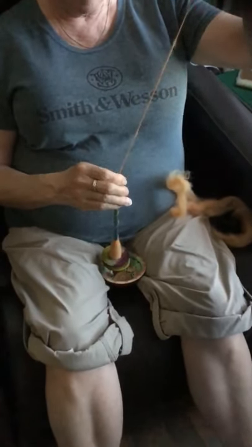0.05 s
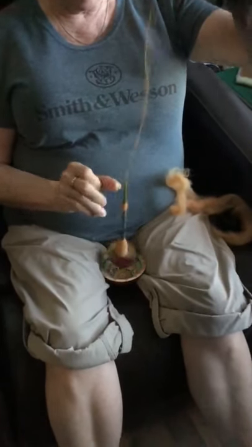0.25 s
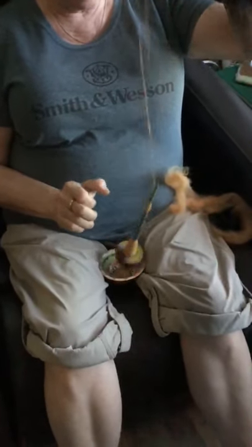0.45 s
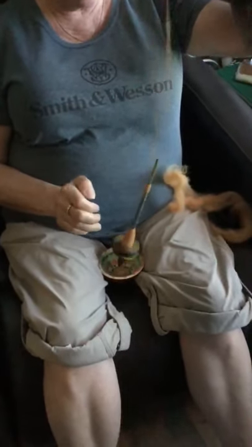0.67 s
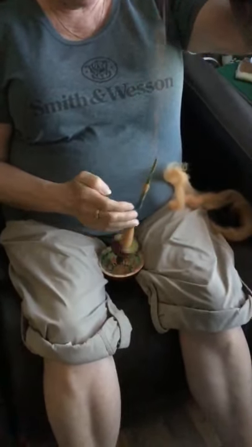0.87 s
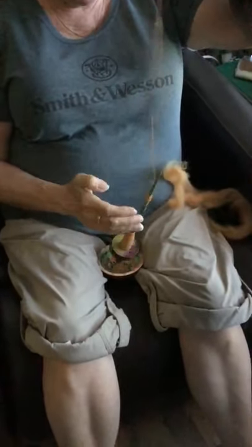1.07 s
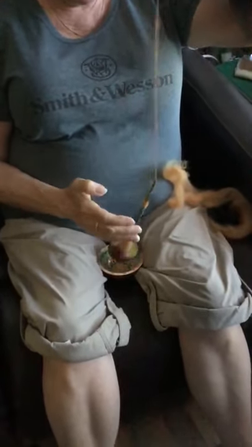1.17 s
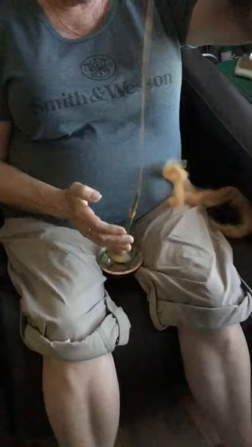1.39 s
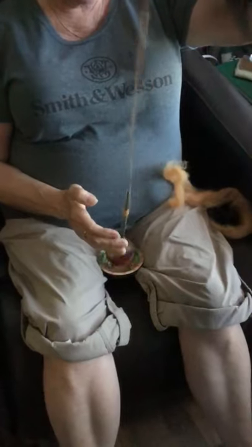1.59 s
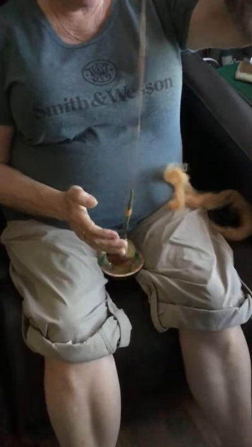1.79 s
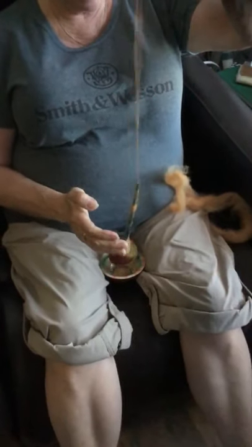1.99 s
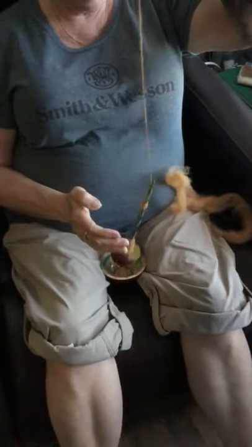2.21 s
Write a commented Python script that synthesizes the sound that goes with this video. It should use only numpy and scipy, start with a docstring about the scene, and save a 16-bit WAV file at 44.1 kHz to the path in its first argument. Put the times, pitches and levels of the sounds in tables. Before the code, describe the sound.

A spindle spins in a small glazed dish, its tip scraping roughly with quick rattling clicks and tiny squeaks. The scrape breaks into ever weaker scuffs, heard close by in a quiet room with a low hum.

```python
"""In a quiet room with a low hum, a spindle is flicked into a spin in a small dish.
Stick-slip friction drives the dish's modes as the tip scrapes round the bowl; the tip also judders,
rattles against the glaze and chirps when it locks on to a mode. As the spindle settles, the scrape
breaks up into soft, ever weaker scuffs. A faint low tone swells at the very end."""
import sys
import numpy as np
from scipy import signal
from scipy.fft import rfft, irfft, next_fast_len
from scipy.io import wavfile
from scipy.ndimage import uniform_filter1d, map_coordinates

SR = 44100
rng = np.random.default_rng(int(sys.argv[2]) if len(sys.argv) > 2 else 0)


def unload_wav(signal):
    """Save mono or channel-first audio to the path in sys.argv[1] as 16-bit WAV at rate SR, clipped to [-1, 1]."""
    wavfile.write(
        sys.argv[1],
        SR,
        np.round(np.clip(np.atleast_2d(signal).T, -1, 1) * 32767).astype(np.int16),
    )


N = 99225

# spectrum of the room's air, a murmur under faint hiss: f/Hz, level/dB
AIR_SPECTRUM = [(15, -72), (25, -37), (49, -10.5), (69, -4.5), (93, -7), (129, -3.5), (164, -8.5),
                (297, -6.5), (421, -16), (1080, -18.5), (1850, -24), (4750, -26), (11000, -35.5),
                (14000, -42), (15500, -56)]
# envelope of the low tone: t/s, level/dB
DRONE_ENVELOPE = [(0, -78), (2.15, -80.5), (2.2, -63), (2.25, -63.5)]
# modes of the dish: f/Hz, T60/s, level/dB
DISH_MODES = [(618.5, 0.026, -8.5), (728, 0.033, -8), (803.4, 0.077, -6.5), (926, 0.039, -11),
              (1081, 0.037, -2.5), (1203, 0.046, -2), (1317, 0.058, -3.5), (1428, 0.032, -5.5),
              (1580, 0.022, -6), (1706, 0.058, -7), (1790, 0.021, -7), (2426, 0.0084, -8), (3298, .015, -4),
              (3670, 0.0082, -9), (3922, 0.024, -10.5), (5550, 0.0074, -7), (6550, 0.0092, -9),
              (7330, 0.011, -16), (8220, 0.017, -12.5), (10270, 0.0026, -24.5), (12040, 0.011, -32)]
# friction force of the scrape: t/s, level/dB
SCRAPE_FORCE = [(.19, -90), (.23, -58.5), (.256, -49), (.308, -42), (.328, -42.5), (.38, -47), (.408, -51),
                (.43, -46.5), (.467, -49.5), (.52, -45), (.56, -52), (.585, -43.5), (.70, -48), (.764, -48),
                (.795, -49), (.81, -46.5), (.875, -44), (.94, -50.5), (.99, -55), (1.03, -50), (1.11, -49),
                (1.16, -54), (1.205, -54.5), (1.226, -64), (1.30, -59), (1.35, -67), (1.42, -71),
                (1.52, -73), (1.65, -86)]
# spells of even slipping: t/s, duration/s, slip rate/Hz, level/dB
JUDDER_EVENTS = [(0.209, 0.063, 335, -51), (0.236, 0.041, 320, -50.5), (1.44, 0.029, 335, -63.5)]
# envelope of the gritty treble: t/s, level/dB
GRIT_ENVELOPE = [(.21, -101), (.235, -64), (.34, -59), (.41, -66), (.60, -62), (.74, -73), (.79, -58),
                 (.85, -60.5), (.92, -71), (1.08, -66), (1.15, -89), (1.5, -92)]
# hard impacts of the tip: t/s, click level/dB, ring level/dB
KNOCK_EVENTS = [(.242, -60, -64.5), (.256, -49.5, -47.5), (0.27, -44, -43.5), (0.298, -46.5, -55),
                (0.3133, -43.5, -71), (.342, -59, -70), (.358, -46.5, -46.5), (.376, -43.5, -55),
                (.420, -43, -47), (.440, -42, -45), (0.4737, -44.5, -46), (0.48, -50, -57),
                (.503, -46, -66), (0.523, -53, -49), (0.5308, -49, -56), (.547, -45, -44), (.567, -40, -44),
                (0.6003, -49, -46), (.617, -53.5, -48), (0.651, -72, -48), (0.682, -60, -57),
                (0.695, -56, -50.5), (.719, -45, -46), (0.7743, -51.5, -44.5), (0.7984, -50.5, -49),
                (.8332, -43, -43), (0.899, -57.5, -53), (.954, -52, -76), (0.963, -49, -55.5),
                (0.995, -54, -53.5), (1.054, -60, -48.5), (1.064, -56.5, -51.5), (1.1058, -56.5, -50),
                (1.1685, -55, -54), (1.263, -64, -59), (1.274, -64, -60.5), (1.385, -61, -55)]
# chirps, mostly on lower modes as the spin slows: t/s, duration/s, f/Hz, level/dB
CHIRP_EVENTS = [(0.242, 0.0047, 3430, -49), (0.295, 0.013, 3260, -46.5), (0.348, 0.013, 3325, -54),
                (0.468, 0.021, 3293, -46), (0.547, 0.0084, 3236, -43), (0.584, 0.0077, 3200, -45),
                (0.616, 0.025, 3280, -48), (0.647, 0.01, 3250, -48), (0.774, 0.012, 3450, -43.5),
                (.800, 0.0033, 3550, -40), (.808, 0.0075, 3450, -53), (0.848, 0.013, 3330, -41.5),
                (.877, 0.0052, 3340, -48), (.944, 0.026, 808, -50), (1.005, 0.05, 1195, -48.5),
                (1.043, 0.02, 793, -48), (1.166, 0.03, 798, -48.5), (1.232, 0.019, 1214, -50),
                (1.268, 0.016, 796, -46.5), (1.288, .065, 810, -58), (1.295, 0.036, 3300, -62),
                (1.382, 0.029, 896, -60)]
# strokes of the wobbling tip: t/s, level/dB, duration/s, favoured f/Hz
SCUFF_EVENTS = [(.249, -42.5, 0.0052, 1390), (.288, -43.5, 0.0035, 1300), (.317, -42.5, 0.037, 2340),
                (0.3217, -37, 0.022, 1240), (.4185, -42, 0.0077, 820), (.565, -47, 0.0084, 1410),
                (.7985, -45.5, 0.0039, 1310), (.860, -42, 0.037, 1480), (1.098, -46.5, .03, 1610),
                (1.170, -50.5, 0.033, 1580), (1.237, -50, 0.0078, 1200), (1.266, -47.5, 0.014, 1490),
                (1.305, -51, 0.016, 1110), (1.367, -49.5, 0.015, 1220), (1.382, -52, .009, 1040),
                (1.450, -60, 0.02, 780), (1.578, -58.5, 0.013, 1100), (1.657, -59, 0.013, 1170),
                (1.729, -60, 0.0091, 824), (1.832, -59, 0.0085, 900), (2.033, -62.5, 0.01, 910)]
# excitation spectrum of each kind of contact: f/Hz, level/dB
SLIP_SPECTRUM = [(200, -31.5), (480, -2), (580, 1.5), (1300, -1), (2500, -3.5), (4000, -8), (7000, -28.5),
                 (10000, -3), (15000, 4)]
JUDDER_SPECTRUM = [(300, -23), (1100, -11), (1350, -1.5), (1650, -2.5), (2000, -21), (4000, -24)]
GRIT_SPECTRUM = [(1500, -38), (4400, -4.5), (5500, 2.5), (6700, 1), (7600, -12), (10000, -11), (15000, -31)]
CLICK_SPECTRUM = [(300, -18), (1200, 3.5), (2500, -6.5), (4400, -7), (5400, -0.5), (6800, 3), (7500, -10),
                  (8450, -4), (9200, -15), (10300, -11.5), (11200, -20), (12000, -18.5), (13000, -24),
                  (15800, -23.5)]
RING_SPECTRUM = [(300, -22.5), (1200, -9.5), (2500, -6), (3200, 0), (4000, 0.5), (4800, -6), (12000, -24)]
SCUFF_SPECTRUM = [(200, -22), (550, -14), (800, 5.5), (1200, 2), (1500, -1.5), (2200, -2.5), (4000, -9.5),
                  (10000, -30)]
# reverberation time of the room: f/Hz, T60/s
ROOM_DECAY = [(200, .25), (1200, .22), (3300, .15), (14000, .12)]

# gains added to the tabled levels
SCRAPE_DB, JUDDER_DB, CLICK_DB, RING_DB, CHIRP_DB, SCUFF_DB = -1.5, 4, 1, 2, -1.5, -2
SLIPS_PER_S, CHATTER_PER_S, GRAINS_PER_S = 650, 600, 800


def amp(db):
    """Amplitude ratio of a level in decibels."""
    return 10 ** (np.asarray(db) / 20)


def unit(x):
    """x normalised to rms 1."""
    return x / np.sqrt(np.mean(x ** 2) + 1e-20)


def along(points, hz):
    """(f/Hz, value) points interpolated in log frequency."""
    freqs, values = np.transpose(points)
    return np.interp(np.log(hz + 1), np.log(freqs + 1), values)


def curve(points):
    """(t/s, value) points interpolated at every sample."""
    return np.interp(np.arange(N) / SR, *np.transpose(points))


def wobble(rate):
    """Smooth random modulation, rate knots a second."""
    knots = rng.standard_normal(int(N * rate / SR) + 4)
    return map_coordinates(knots, [np.arange(N) * rate / SR])


def decay(t, t60):
    """Exponential damping, 60 dB in t60 seconds."""
    return np.exp(-np.log(1000) * t / t60)


def filtered(x, response):
    """Linear filtering: the spectrum of x times a frequency response."""
    size = next_fast_len(N + SR // 2)
    return irfft(rfft(x, size) * response(np.fft.rfftfreq(size, 1 / SR)), size)[:N]


def minimum_phase(spectrum, size=2048):
    """Causal impulse response of a spectrum, by folding its cepstrum."""
    cepstrum = irfft(np.log(amp(along(spectrum, np.fft.rfftfreq(size, 1 / SR)))))
    cepstrum[1:size // 2] *= 2
    cepstrum[size // 2 + 1:] = 0
    return irfft(np.exp(rfft(cepstrum)))


def add(track, start, sound):
    """Superpose a sound on the track at start seconds."""
    part = track[max(round(start * SR), 0):][:len(sound)]
    part += sound[:len(part)]


def at_level(x, db):
    """x with its greatest short-time rms at db."""
    return x * amp(db) / np.sqrt(uniform_filter1d(x ** 2, 256).max() + 1e-20)


def swell(t, duration):
    """Envelope with a rounded rise and fall."""
    return np.sqrt(np.abs(np.sin(np.pi * np.clip(t / duration, 0, 1))))


def background(air_db=-65, hum_hz=66.7, hum_db=-69, drone_hz=305):
    """Broadband air noise under a hum and a low tone, both wavering by random modulation."""
    t = np.arange(N) / SR
    air = unit(filtered(rng.standard_normal(N), lambda hz: amp(along(AIR_SPECTRUM, hz))))
    hum = unit(np.sin(2 * np.pi * hum_hz * t + 0.15 * wobble(7.6)) * amp(-wobble(11)))
    drone = unit(np.sin(2 * np.pi * drone_hz * t + 1.1 * wobble(14)))
    return amp(air_db) * air + amp(hum_db) * hum + amp(curve(DRONE_ENVELOPE)) * drone


def slips(size, rate, uneven=0.5, scatter_db=4, grit_share=0.14):
    """Stick-slip friction: one force pulse a release, over fine noise; rms 1."""
    gap_draw, force_draw = rng.uniform(-np.sqrt(3), np.sqrt(3), (size // 10, 2)).T
    onsets = (np.cumsum(np.exp(uneven * gap_draw)) * SR / rate).astype(int)
    onsets -= onsets[0]
    inside = onsets < size
    pulses = np.bincount(onsets[inside], amp(scatter_db * force_draw[inside]), size)
    return unit(unit(pulses) + grit_share * rng.standard_normal(size))


def dish(contact_spectrum):
    """Modal superposition: one contact sets the dish ringing as a sum of damped cosines."""
    t = np.arange(SR // 10) / SR
    ring = sum((-1) ** k * amp(db) / np.sqrt(t60) * decay(t, t60) * np.cos(2 * np.pi * hz * t)
               for k, (hz, t60, db) in enumerate(DISH_MODES))
    return signal.fftconvolve(ring, minimum_phase(contact_spectrum))


def scrape(treble_hz=2000, neutral_db=-58.5, dulling_db_per_s=1, flutter_per_s=39):
    """Forced vibration: slips drive the dish, brighter with force and duller as the spin slows."""
    force_db, t = curve(SCRAPE_FORCE), np.arange(N) / SR
    body = unit(signal.fftconvolve(slips(N, SLIPS_PER_S), dish(SLIP_SPECTRUM))[:N])
    treble = filtered(body, lambda hz: 1 - 1 / (1 + (hz / treble_hz) ** 4))
    treble_db = 0.5 * (force_db - neutral_db) - dulling_db_per_s * t
    treble_db += 3 * np.tanh(wobble(flutter_per_s))
    level_db = force_db + SCRAPE_DB + 0.2 * np.tanh(wobble(flutter_per_s))
    return amp(level_db) * (body + (amp(treble_db) - 1) * treble)


def judders():
    """Relaxation oscillation: nearly periodic slips make the dish buzz at the slip rate."""
    out, t, ring = np.zeros(N), np.arange(SR // 12) / SR, dish(JUDDER_SPECTRUM)
    for start, duration, rate, db in JUDDER_EVENTS:
        force = swell(t, duration) * slips(len(t), rate, uneven=0.035)
        add(out, start, at_level(signal.fftconvolve(force, ring), db + JUDDER_DB))
    return out


def grit(flutter_db=6):
    """Roughness noise: tiny asperities of the glaze hiss under the tip."""
    grains = unit(signal.fftconvolve(slips(N, GRAINS_PER_S), minimum_phase(GRIT_SPECTRUM))[:N])
    return amp(curve(GRIT_ENVELOPE) + flutter_db * np.tanh(wobble(120))) * grains


def rattle(click_t60_s=0.014, chatter_t60_s=0.035):
    """Impact excitation: each knock clicks, and its brief chatter rings the dish's upper modes."""
    out, t = np.zeros(N), np.arange(SR // 16) / SR
    click, ring = minimum_phase(CLICK_SPECTRUM), dish(RING_SPECTRUM)
    for start, click_db, ring_db in KNOCK_EVENTS:
        burst = rng.standard_normal(len(t)) * decay(t, click_t60_s)
        chatter = slips(len(t), CHATTER_PER_S) * decay(t, chatter_t60_s)
        add(out, start, at_level(signal.fftconvolve(burst, click), click_db + CLICK_DB))
        add(out, start, at_level(signal.fftconvolve(chatter, ring), ring_db + RING_DB))
    return out


def chirps(jitter_rad=0.94, wobbles_per_cycle=0.081):
    """Mode lock-in: the sticking tip briefly sustains one rough tone of the dish."""
    out, t = np.zeros(N), np.arange(SR // 12) / SR
    for start, duration, hz, db in CHIRP_EVENTS:
        jitter = jitter_rad * wobble(wobbles_per_cycle * hz)[:len(t)]
        tone = np.sin(2 * np.pi * hz * t + jitter)
        add(out, start, at_level(swell(t, duration) * tone, db + CHIRP_DB))
    return out


def scuffs(focus=0.79, bandwidth_hz=300):
    """Selective excitation: each spot the wobbling tip rubs favours one band of the dish's modes."""
    out, t, ring = np.zeros(N), np.arange(SR // 8) / SR, dish(SCUFF_SPECTRUM)
    for start, db, duration, hz in SCUFF_EVENTS:
        stroke = np.sqrt(t / duration) * np.exp(-2 * (t / duration) ** 2)
        force = stroke * slips(len(t), SLIPS_PER_S)
        favoured = signal.lfilter(*signal.iirpeak(hz, hz / bandwidth_hz, SR), ring)
        spot = unit(ring) + focus * unit(favoured)
        add(out, start, at_level(signal.fftconvolve(force, spot), db + SCUFF_DB))
    return out


def room(x, gain_db=-8):
    """Reverberation: a short diffuse tail whose treble dies first."""
    hz, t, noise = signal.stft(rng.standard_normal(SR // 2), SR, nperseg=256)
    tail = signal.istft(noise * decay(t, along(ROOM_DECAY, hz)[:, None]), SR, nperseg=256)[1]
    delayed = np.pad(x, (SR // 250, 0))  # 4 ms
    return amp(gain_db) * signal.fftconvolve(delayed, tail / np.linalg.norm(tail))[:N]


def scene():
    """Superposition of the spindle's direct sound, its reverberation and the background."""
    spindle = scrape() + grit() + rattle() + chirps() + judders() + scuffs()
    return (spindle + room(spindle) + background())[None]


def record(dry):
    """Band limiting: the microphone passes nothing above its cutoff."""
    cutoff_hz = 15830
    return filtered(dry[0], lambda hz: hz < cutoff_hz)[None]


dry = scene()
out = record(dry)
unload_wav(out)
```